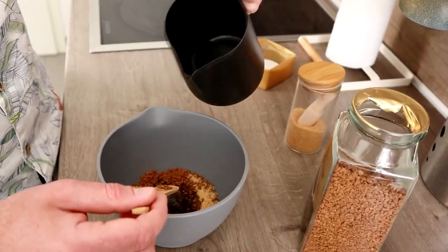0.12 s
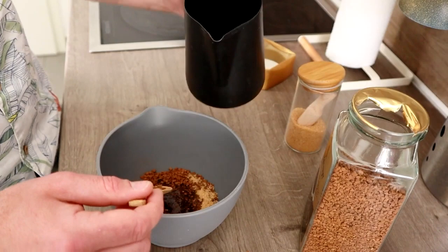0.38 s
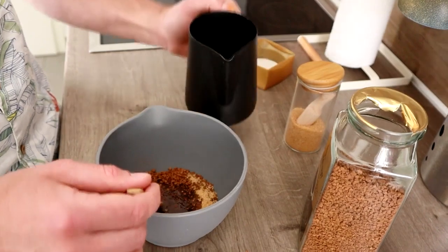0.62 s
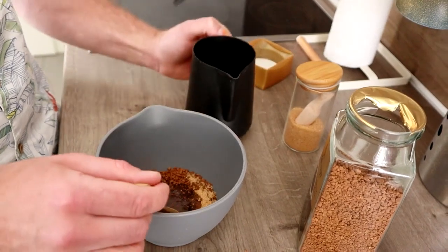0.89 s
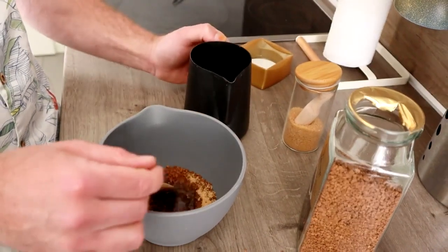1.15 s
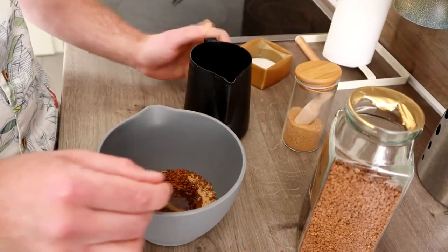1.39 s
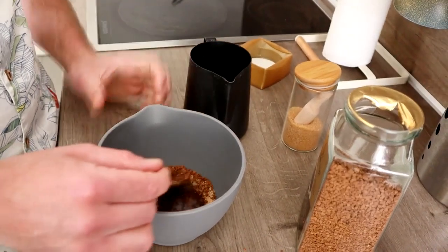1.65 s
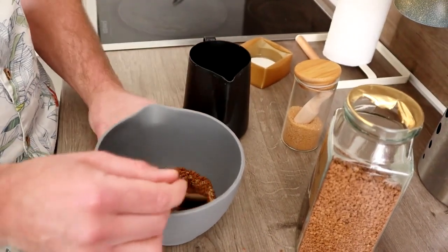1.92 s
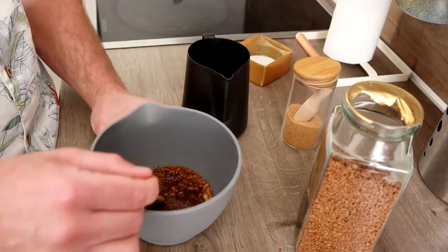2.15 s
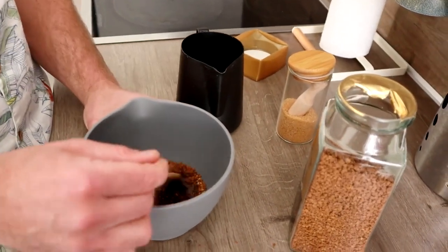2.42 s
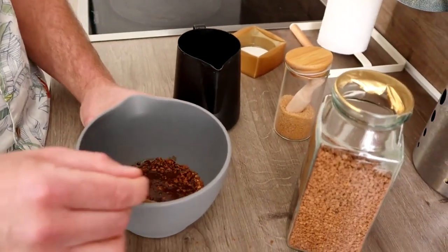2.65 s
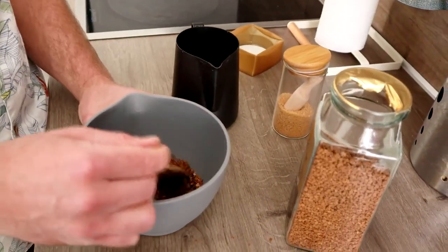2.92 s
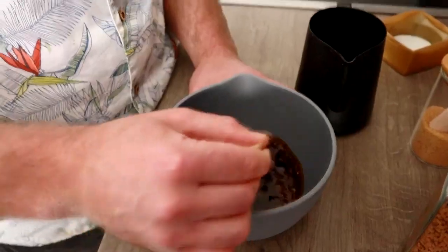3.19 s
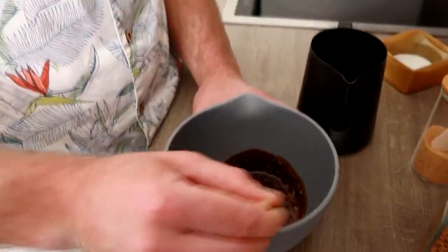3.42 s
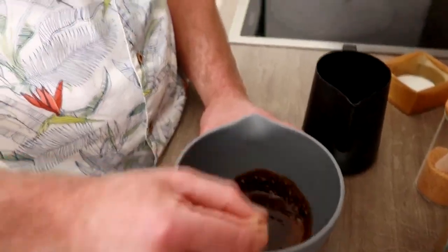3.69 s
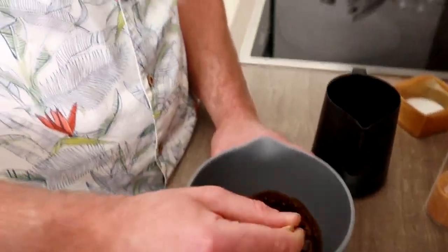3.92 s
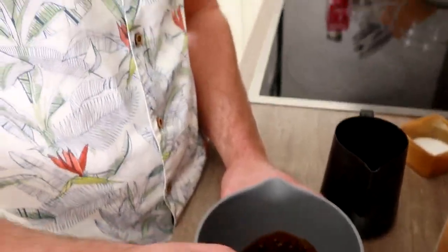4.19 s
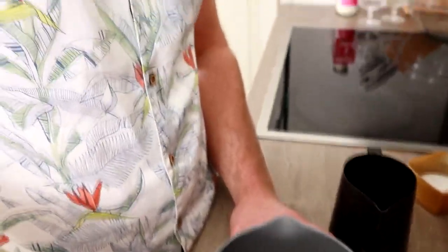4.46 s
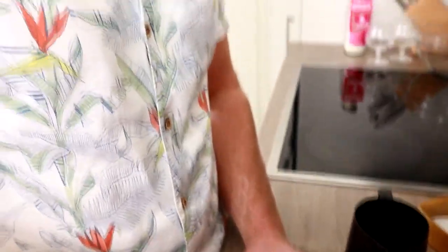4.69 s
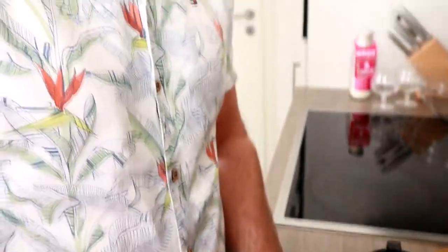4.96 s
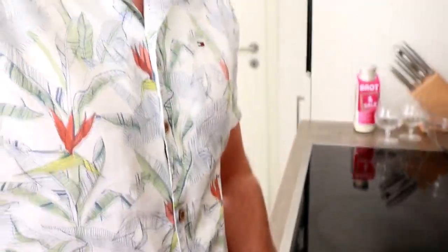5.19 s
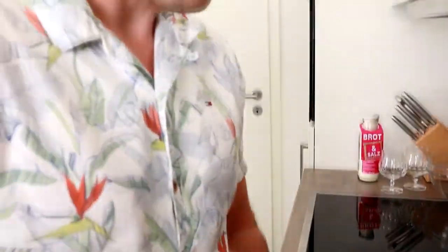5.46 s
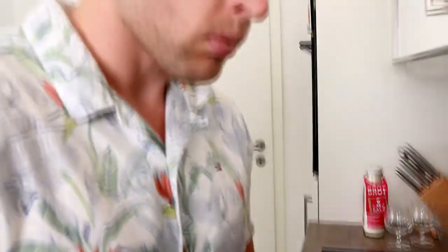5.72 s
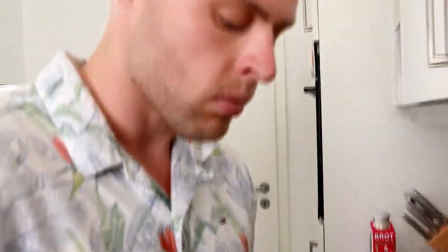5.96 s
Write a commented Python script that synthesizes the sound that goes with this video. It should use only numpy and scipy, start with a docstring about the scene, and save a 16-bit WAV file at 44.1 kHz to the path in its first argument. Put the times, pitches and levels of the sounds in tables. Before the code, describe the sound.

A handheld microphone close to the bowl picks up quiet rumble, light hiss and a little room reflection. After a nearly empty first second, a jug is put down with a knock and small settling taps. Wet granules scrape and crackle under a spoon in a plastic bowl, at first in light irregular strokes, then in fast, forceful circles with hollow scuffs and hard clicks against the side, unbroken to the end.

```python
"""Over counter rumble, microphone handling and hiss, a steel jug first touches the counter faintly.
A spoon then starts stirring wet sugar and coffee granules round a plastic bowl: random grain contacts
and snapping crystals drive the bowl's resonances. Just after one second the jug is set down, its
touches ringing decaying modes. The stirring goes on to the end, harder in the second half, with raps
of the spoon's edge on the wall. Feedback delays give bowl and jug a kitchen around them."""
import sys
import numpy as np
from scipy import signal
from scipy.fft import rfft, irfft, next_fast_len
from scipy.io import wavfile
from scipy.ndimage import uniform_filter1d

SR = 44100
rng = np.random.default_rng(int(sys.argv[2]) if len(sys.argv) > 2 else 0)


def convert_level_to_amplitude(level_db):
    """Map a level in decibels to its linear amplitude factor."""
    exponent = np.asarray(level_db, float) / 20
    return 10 ** exponent


def master(y):
    """Save y as 16-bit WAV."""
    cut = np.clip(np.atleast_2d(y).T, -1, 1)
    pcm = np.round(cut * 32767)  # scale
    wavfile.write(sys.argv[1], SR, pcm.astype(np.int16))


N = 268688

# grip on the microphone: (time [s], level [dB])
HANDLING_CURVE = [(0, -45.5), (.55, -50.5), (.68, -45), (1.0, -54), (1.2, -66), (2.6, -67), (3.09, -62),
                  (3.15, -54), (3.4, -57), (5.7, -57), (5.85, -52), (6.09, -58)]
# colour of the hiss: (frequency [Hz], relative density [dB])
HISS_COLOUR = [(180, -43), (300, -5), (385, -6.5), (654, -21.5), (1290, 2), (8410, -5.5), (15800, -5.5)]
HISS_DB = -56   # before the suppressor

# the jug slides and settles on the counter: (start [s], held [s], level [dB])
JUG_SLIDES = [(.9, 0.093, -41.5), (1.125, .12, -32.5), (1.286, .055, -37)]
SLIDE_RISE_DB_S, SLIDE_SAG_DB_S, SLIDE_FALL_DB_S = 1200, 53, 900
# the bowl is pushed down on the counter: (start [s], held [s], level [dB])
BOWL_THUMPS = [(1.13, 0.089, -48), (1.6, 0.11, -53), (2.2, 0.077, -49), (2.52, 0.021, -58),
               (3.16, 0.025, -59), (4.72, 0.026, -49.5), (5.81, 0.039, -51)]
THUMP_RISE_DB_S, THUMP_SAG_DB_S, THUMP_FALL_DB_S = 170, 41, 153
# rumble under a drag of -33 dB, and its change in dB per dB of drag
COUNTER_DB, COUNTER_LOW_DB, COUNTER_FOLLOWS_DRAG = -52.5, -58.5, 0.21

KITCHEN_T60_S, KITCHEN_DB, WALL_CUT_HZ = 0.46, -19.5, 5300   # t60 of the lows

# jug base meets the counter: (time [s], level [dB], hardness [dB per octave], contact [s])
JUG_TOUCHES = [(0.588, -44.5, -1.5, 0.0016), (1.105, -50, 5, 0.0017), (1.1091, -13.5, 0.5, 0.0027),
               (1.135, -23, -1.5, 0.0022), (1.261, -39, 4, 0.0015), (1.285, -26, 0, 0.002),
               (1.316, -44, 4, 0.019)]
# jug and counter ring: (frequency [Hz], relative level [dB], t60 [s])
JUG_MODES = [(148, -12, 0.13), (218.5, -13, 0.16), (300, -20, 0.06), (378, -12, 0.051), (421, -7.5, 0.11),
             (452, -14.5, 0.21), (483, -31, 0.092), (557, 3, 0.038), (610, -23, .12), (684, -13, 0.04),
             (700, -23, 0.089), (891, -17, 0.2), (1410, -6, 0.023), (1615, -19.5, 0.47), (1540, -17, 0.2),
             (2050, -15, 0.028), (2460, -35, 0.11), (3220, -31, 0.13), (5260, -28, 0.11), (5640, -25, 0.03),
             (6800, -44, 0.36), (6150, -29.5, 0.31), (6800, -29, 0.12), (7250, -41, 0.11), (8349, -41, .2),
             (8700, -34, 0.13), (9900, -33, 0.14), (12000, -24, 0.033)]

# bowl resonances in four registers: (frequency [Hz], width [Hz], relative level [dB])
BODY_MODES = [(616, 43, -2.5), (670, 28.5, 0), (772.5, 73, 2), (878, 17.2, -1), (946, 35, -4),
              (1142, 96, 3), (1234, 67, 2.5), (1297, 124, 6)]
WALL_MODES = [(1772, 173, 6.5), (1818, 82, 5), (1893, 95, 0), (2186, 257, 0.5), (2537, 290, -2),
              (2792, 70, -1.5), (2897, 270, -1), (3209, 120, -2.5), (3413, 214, -0.5), (3980, 490, 1.5)]
UPPER_MODES = [(4470, 116, -1.5), (4690, 100, -4.5), (4940, 210, 1.5), (5440, 380, 2), (5520, 156, 2),
               (5603, 530, -0.5), (6790, 590, 0), (6785, 590, -5)]
GRIT_MODES = [(7640, 680, 3.5), (9000, 700, 2), (9740, 250, 0), (11020, 700, 5.5), (12640, 660, 2),
              (14200, 400, -4.5), (15300, 1100, -5)]

# drags over the bottom that shake the whole bowl:
# (full pressure from [s], held [s], level [dB], favoured body pitch [Hz])
DRAGS = [(0.939, 0.19, -49, 800), (1.117, 0.12, -36.5, 734), (1.3, 0.14, -38.5, 845),
         (1.618, 0.16, -39, 880), (1.772, 0.016, -31, 940), (1.873, 0.097, -36, 950),
         (2.066, 0.066, -37, 860), (2.267, 0.069, -35.5, 930), (2.455, 0.075, -36, 860),
         (2.535, 0.22, -38, 840), (2.749, 0.0058, -32.5, 935), (2.923, 0.008, -51.5, 900),
         (3.025, 0.012, -42.5, 840), (3.153, 0.042, -25, 766), (3.329, 0.096, -31, 804),
         (3.526, 0.024, -26.5, 814), (3.684, 0.074, -33, 685), (3.855, 0.068, -28, 860),
         (4.013, 0.11, -32.5, 820), (4.261, 0.31, -27.5, 808), (4.607, 0.042, -28, 852),
         (4.724, 0.12, -37, 810), (4.987, 0.0041, -27.5, 853), (5.089, 0.218, -34.5, 830),
         (5.395, 0.098, -34, 818), (5.543, 0.117, -38, 830), (5.744, 0.15, -32.5, 826),
         (5.934, 0.17, -38, 860.0)]
DRAG_RISE_DB_S, DRAG_SAG_DB_S, DRAG_FALL_DB_S = 231, 34, 184
FOCUS_PER_DB = 1.26   # a harder drag gathers the body's sound round its favoured pitch
# strokes of the spoon along the wall:
# (full pressure from [s], held [s], level [dB], relative grit [dB], favoured wall pitch [Hz])
STROKES = [(0.764, 0.039, -51.5, -1.5, 3220.0), (0.879, 0.079, -46.5, -3, 3220),
           (0.988, 0.0056, -41.9, -14, 3150), (1.131, 0.013, -37.5, -16, 3070.0),
           (1.222, 0.0057, -35.5, -32, 3250), (1.33, 0.11, -38, -14.5, 2710),
           (1.606, 0.0024, -40.5, -11.3, 3050), (1.697, 0.025, -39.5, -11, 3030),
           (1.764, 0.085, -35, -22, 2670), (1.87, 0.011, -32.5, -17.5, 2740),
           (1.951, 0.087, -41, -15, 2940), (2.113, 0.014, -33, -15.5, 3050),
           (2.233, 0.013, -34.5, -13.8, 3400), (2.292, 0.022, -36, -11, 2940),
           (2.453, 0.026, -40, -19, 3100), (2.525, 0.0058, -29, -16, 3000), (2.612, 0.031, -34, -11, 2640),
           (2.715, 0.038, -37, -14.5, 3270), (2.924, 0.025, -45.5, -18, 3170.0),
           (3.024, 0.04, -42.5, -12.3, 3100), (3.136, 0.005, -27.5, -15, 2700),
           (3.275, 0.0045, -27, -17, 3280), (3.384, 0.028, -27, -14, 2800),
           (3.512, 0.043, -28, -16.5, 3280), (3.673, 0.019, -27.5, -18.5, 3060),
           (3.762, 0.039, -27, -11, 2800), (3.895, 0.015, -27, -17, 2950), (3.988, 0.039, -33, -19, 2880),
           (4.07, 0.011, -26, -16.5, 3210.0), (4.168, 0.11, -31, -11.5, 2930),
           (4.283, 0.056, -32.5, -26, 2960), (4.372, 0.066, -28, -16, 3270), (4.478, 0.015, -28, -11, 2970),
           (4.555, 0.086, -34.5, -14.5, 2850), (4.748, 0.011, -27.5, -16.5, 3410),
           (4.804, 0.13, -38.5, -12, 3360), (4.947, 0.026, -27.5, -12.9, 3150),
           (5.07, 0.034, -28, -25.5, 3040), (5.157, 0.067, -36, -18.4, 3070.0),
           (5.243, 0.011, -31.5, -19, 2820), (5.315, 0.0044, -37, -15, 3150),
           (5.373, 0.034, -33, -28, 2950), (5.48, 0.036, -30, -29, 3440), (5.563, 0.062, -32.5, -21, 2930),
           (5.73, 0.028, -31.5, -21, 3130), (5.87, 0.033, -32.5, -25.5, 3190.0),
           (5.99, 0.041, -32, -17, 2850)]
STROKE_RISE_DB_S, STROKE_SAG_DB_S, STROKE_FALL_DB_S = 294, 0, 178
UPPER_DB, UPPER_FOLLOWS_GRIT = 0.5, 0.31   # a grittier stroke also reaches higher up the wall

# crystals cracking under the spoon: (time [s], level [dB], relative body [dB], relative grit [dB])
CRACKS = [(0.9884, -30, 12.5, -14), (1.0021, -27.5, -10, -6), (1.1109, -25.5, 9.5, -10),
          (1.1323, -29, -11, -25), (1.2206, -25, 0, -21), (1.2414, -30.5, 4.5, -16),
          (1.4296, -26.5, -7, -8), (1.5888, -32, -1, -17), (1.6102, -23.5, -1, -15), (1.6877, -30, -1, -17),
          (1.8068, -34, -11, -29), (1.8716, -34, -16, -22), (2.0128, -29, -14, -8.5), (2.1156, -25, 5, -23),
          (2.1959, -22, -24, -11), (2.2179, -34.5, -8, -16), (2.2303, -17.5, -12, -13),
          (2.4364, -17, -1, -19), (2.4613, -21, -6, -17), (2.4838, -21.5, -12, -19),
          (2.5202, -20.5, 1, -21), (2.5834, -40, -16, -5), (2.614, -24, 0, -18), (2.9043, -29.5, 5, -17),
          (2.9272, -30, -16, -13), (2.9592, -26.5, -13, -16), (3.0041, -31, -5, -13), (3.0254, -37, 9, -19),
          (3.046, -28.5, -11, -19), (3.0839, -24.5, -12, -13), (3.1068, -20, 2.5, -15),
          (3.1318, -13.5, -4, -22), (3.253, -24, -9, -23), (3.272, -22, -17, -25), (3.3742, -28, -8, -17),
          (3.5094, -30, 0, -14), (3.5244, -27, 10.5, -20), (3.6571, -23, 5, -18), (3.696, -18, -2.5, -19),
          (3.7604, -26.5, -8, -16), (3.8901, -34, 0, -19), (3.9943, -25, -10, -13), (4.0592, -25, -18, -17),
          (4.2467, -31, -5, -8), (4.2732, -32, -11, -20), (4.2946, -23, -11, -25), (4.4832, -25, -21, -19),
          (4.7288, -24, -3, -16), (4.7404, -23, -2, -6), (4.7581, -13, -22, -16), (4.8015, -32, -23, -27),
          (4.9062, -31, -16, -15), (4.9576, -25, -20, -20), (4.9757, -19, -5, -16), (5.0499, -24, -18, -20),
          (5.0964, -24, -9, -23), (5.1517, -25, -10, -24), (5.239, -23.5, -6, -33), (5.3098, -22, -12, -15),
          (5.3712, -25.5, 1.5, -21), (5.5628, -22, -6, -30), (5.7049, -29.5, -1, -11),
          (5.7219, -26.5, 2, -22), (5.8651, -23, -8, -29), (5.8975, -27, -17, -19), (5.9949, -20, -13, -22)]
CRUNCH_DB, CRUNCH_T60_S = -5.0, 0.025   # trim of every crack, and how fast it dies
# fine ticks of single crystals against the wall: (time [s], level [dB])
TICKS = [(0.9885, -35), (1.0031, -28), (1.0924, -42), (1.1113, -26), (1.263, -33), (1.3448, -47),
         (2.0118, -33), (2.1945, -27), (2.2178, -38), (2.4393, -34), (2.5182, -30), (2.583, -25.5),
         (2.613, -33), (2.7451, -28.5), (2.927, -39), (3.049, -32), (3.1046, -26.5), (3.3448, -40),
         (3.375, -35), (3.474, -27), (3.5158, -22.5), (3.7015, -25), (3.7489, -21), (3.7848, -27),
         (3.998, -22.5), (4.0592, -26), (4.1968, -41), (4.237, -18), (4.3814, -33), (4.5611, -20),
         (4.7303, -37), (4.7406, -26), (4.9387, -33), (5.0973, -25.5), (5.162, -33), (5.3088, -33)]
TICK_UPPER_DB, TICK_SPREAD_DB = 1.5, 6   # trim and random spread (plus or minus) in the upper modes
# the spoon's edge raps the wall: (time [s], level [dB])
RAPS = [(1.7, -22), (2.228, -16.5), (2.5409, -10.5), (2.9263, -20), (3.1332, -8.5), (3.408, -16),
        (4.065, -16), (4.0754, -11.5), (4.6376, -31), (4.7502, -14), (4.7586, -6), (5.1674, -13.5)]


def rms_one(x):
    """Scale to rms 1."""
    return x / np.sqrt(np.mean(x ** 2) + 1e-20)


def drift(rate_hz):
    """Slow smoothed chance of rms 1, computed at every 20th sample."""
    r = np.exp(-2 * np.pi * rate_hz * 20 / SR)
    noise = rng.standard_normal(N // 20 + 2002)
    slow = signal.lfilter([1], [1, -2 * r, r * r], noise)[2000:]   # skip the filter's start
    return np.interp(np.arange(N) / 20, np.arange(len(slow)), rms_one(slow))


def band(x, low_hz, high_hz):
    """Butterworth band-pass."""
    return signal.sosfilt(signal.butter(2, [low_hz, high_hz], "band", fs=SR, output="sos"), x)


def pushes(rows, rise_db_s, sag_db_s, fall_db_s):
    """Pushes swell, sag while held and die away; total dB, then further columns blended by power."""
    rows, t = np.array(rows), np.arange(0, N + 64, 64) / SR
    s, held, db = rows[:, :3].T[:, :, None]
    rise = rise_db_s * np.maximum(s - t, 0)
    sag = sag_db_s * np.clip(t - s, 0, held)
    fall = fall_db_s * np.maximum(t - s - held, 0)
    power = convert_level_to_amplitude(db - rise - sag - fall) ** 2 + 1e-30
    total = power.sum(axis=0)
    blended = [10 * np.log10(total), *(rows[:, 3:].T @ power / total)]
    return [np.interp(np.arange(N) / SR, t, c) for c in blended]


def hiss(dry):
    """Coloured noise, turned down by a suppressor for a while after loud sound."""
    hz = np.maximum(np.arange(N // 2 + 1) * SR / N, 1)
    colour_hz, colour_db = np.transpose(HISS_COLOUR)
    colour = convert_level_to_amplitude(np.interp(np.log(hz), np.log(colour_hz), colour_db))
    noise = convert_level_to_amplitude(HISS_DB) * rms_one(irfft(rfft(rng.standard_normal(N)) * colour, N))
    level_db = 10 * np.log10(uniform_filter1d(dry[0] ** 2, size=882) + 1e-12)
    fall_db = 11.0 * np.arange(N) / SR   # release of 11 dB per second
    held_db = np.maximum.accumulate(level_db + fall_db) - fall_db
    return noise * convert_level_to_amplitude(-0.3 * np.clip(held_db + 46.5, 0, 25))


def handling():
    """The grip on the microphone makes a slowly wavering noise at the very bottom."""
    s, db = np.transpose(HANDLING_CURVE)
    low = band(band(rng.standard_normal(N), 10, 45), 17, 54.0)
    return convert_level_to_amplitude(np.interp(np.arange(N) / SR, s, db)) * rms_one(low * convert_level_to_amplitude(1.8 * drift(1.8)))


def counter(body_db):
    """Dull lumpy noise: the worktop follows the drags, takes the sliding jug and the bowl's thumps."""
    stirred = convert_level_to_amplitude(COUNTER_FOLLOWS_DRAG * (np.maximum(body_db, -62.) + 33))
    slides_db, = pushes(JUG_SLIDES, SLIDE_RISE_DB_S, SLIDE_SAG_DB_S, SLIDE_FALL_DB_S)
    thumps_db, = pushes(BOWL_THUMPS, THUMP_RISE_DB_S, THUMP_SAG_DB_S, THUMP_FALL_DB_S)
    upper = band(band(rng.standard_normal(N), 150, 900), 150, 900)
    upper = rms_one(upper * convert_level_to_amplitude(1.54 * drift(41) + 2.7 * drift(6.4)))
    lower = rms_one(band(rng.standard_normal(N), 67.6, 141) * convert_level_to_amplitude(3.0 * drift(21)))
    return (upper * (convert_level_to_amplitude(COUNTER_DB) * stirred + convert_level_to_amplitude(slides_db))
            + lower * (convert_level_to_amplitude(COUNTER_LOW_DB) * stirred + convert_level_to_amplitude(thumps_db)))


def kitchen(x):
    """Ten feedback delays, duller on every round, make the room's reverberation."""
    size = next_fast_len(N + SR)
    turn = np.exp(-2j * np.pi * np.arange(size // 2 + 1) / size)   # delay of one sample
    dull = np.exp(-2 * np.pi * WALL_CUT_HZ / SR)
    walls = 0
    for k, lag in enumerate((rng.uniform(0.0071, 0.035, 10) * SR).astype(int)):
        loss = convert_level_to_amplitude(-60 * lag / SR / KITCHEN_T60_S)
        back = loss * (1 - dull) / (1 - dull * turn) * turn ** lag
        walls = walls + (-1) ** k * back / (1 - back)
    return irfft(rfft(x, size) * walls, size)[:N]


def jug():
    """Each touch drives all modes while contact lasts; a harder touch reaches the high ones more."""
    out, t = np.zeros(N), np.arange(5000) / SR
    for hz, db, t60 in JUG_MODES:
        force = np.zeros(N) + 1e-18
        for s, touch_db, hardness_db, contact_s in JUG_TOUCHES:
            rub = rng.standard_normal(len(t)) * np.exp(-t / max(contact_s, 0.0003))
            # the first strike sets the modes off at once, each in its own direction
            rub[0] = 3.3 * rng.choice([-1, 1])
            # what of the contact falls on this mode
            on_mode = abs(np.sum(rub * np.exp(2j * np.pi * hz * t))) ** 2
            rub = rub / np.sqrt(on_mode + np.sum(rub ** 2) / 10)
            i = round(s * SR)
            force[i:i + len(t)] += convert_level_to_amplitude(touch_db + db + hardness_db * np.log2(hz / 500)) * rub
        r, w = convert_level_to_amplitude(-60 / (t60 * SR)), 2 * np.pi * hz / SR
        out += signal.lfilter([0, np.sin(w)], [1, -2 * r * np.cos(w), r * r], force)
    return out


def resonate(x, hz, width_hz):
    """Two-pole resonance that passes unit white noise at rms 1."""
    r = np.exp(-np.pi * width_hz / SR)
    feed = np.sqrt((1 - r * r) / 2) * np.array([1, 0, -1])
    return signal.lfilter(feed, [1, -2 * r * np.cos(2 * np.pi * hz / SR), r * r], x + 1e-18)


def ringing(modes, force, blows, favoured_hz=None, focus_db=0., wander_db=2.5):
    """The moving contact drives modes near its favoured pitch most, each with a wandering strength."""
    gains = []
    for hz, _, db in modes:
        octaves_off = 0 if favoured_hz is None else np.log2(hz / favoured_hz)
        focus = focus_db * np.minimum(np.abs(octaves_off), 0.6)
        gains.append(convert_level_to_amplitude(db - focus + wander_db * drift(8.1)))
    total = np.sqrt(sum(g ** 2 for g in gains))
    out = np.zeros(N)
    for k, (gain, (hz, width_hz, _)) in enumerate(zip(gains, modes)):
        out += (-1) ** k * resonate((force + blows) * gain / total, hz, width_hz)
    return out


def grains(per_s, spread_db, clump_db):
    """Random contacts of unequal size that come in clumps, on a bed of wet friction; rms 1."""
    sizes = convert_level_to_amplitude(spread_db * np.minimum(rng.exponential(1, N), 4)) * rng.choice([-1, 1], N)
    clicks = rms_one(sizes * (rng.random(N) < per_s / SR))
    gritty = clicks + 0.6 * rng.standard_normal(N)
    clumps = np.clip(drift(40) + 0.4 * drift(100), -2.5, 1.5)
    return rms_one(gritty * convert_level_to_amplitude(clump_db * clumps))


def ticks(rel_db, t60):
    """A crystal's tick is a force pulse that rattles for a few milliseconds."""
    rows, out, k = np.array(TICKS), np.zeros(N + 300), np.arange(300)
    rattles = rng.choice([-1, 1], (len(rows), len(k))) * convert_level_to_amplitude(-60 * k / SR / t60)
    for s, size, rattle in zip(rows[:, 0], convert_level_to_amplitude(rows[:, 1] + rel_db), rattles):
        out[round(s * SR) + k] += size * rattle
    return out[:N]


def cracks(rel_db):
    """A crack swells for a moment, snaps at its height, then dies as a short crunch."""
    out, t = np.zeros(N + 4000), np.arange(4000) / SR
    shape = (1 - np.exp(-t / 0.00047)) * convert_level_to_amplitude(-60 * t / CRUNCH_T60_S)
    noise = rng.standard_normal((len(CRACKS), len(t)))
    for (s, crack_db, *_), db, crunch in zip(CRACKS, rel_db, noise):
        force = crunch * shape / shape.max()
        force[shape.argmax()] = 3.0   # the snap
        i = round(s * SR)
        out[i:i + len(t)] += convert_level_to_amplitude(crack_db + db + CRUNCH_DB) * force
    return out[:N]


def bowl(body_db, body_hz):
    """One gritty force shakes body and wall; lone snapping crystals sharpen the treble."""
    scrape_db, grit_db, wall_hz = pushes(STROKES, STROKE_RISE_DB_S, STROKE_SAG_DB_S, STROKE_FALL_DB_S)
    upper_db = UPPER_DB + UPPER_FOLLOWS_GRIT * grit_db + 2.37 * drift(14.2)
    pressed = convert_level_to_amplitude(scrape_db)
    force = grains(per_s=2500., spread_db=0.5, clump_db=2.5)
    snaps = grains(per_s=500., spread_db=4.5, clump_db=5.0)
    wall_force = pressed * rms_one(force + 0.27 * snaps)
    treble_force = pressed * rms_one(force + 0.54 * snaps)

    rows = np.array(CRACKS)
    hard_blows = cracks(np.zeros(len(rows)))
    for s, rap_db in RAPS:
        hard_blows[round(s * SR)] += 3.0 * convert_level_to_amplitude(rap_db)   # one clean force pulse
    tick_db = TICK_UPPER_DB + TICK_SPREAD_DB * rng.uniform(-1, 1, len(TICKS))
    upper_blows = hard_blows * convert_level_to_amplitude(-7.5) + ticks(tick_db, 0.0073)
    grit_blows = cracks(rows[:, 3]) + ticks(0, 0.0025)

    body_focus_db = np.maximum(19.0 + FOCUS_PER_DB * (body_db + 36), 8.)   # per octave
    body = ringing(BODY_MODES, force * convert_level_to_amplitude(body_db), cracks(rows[:, 2]), body_hz, body_focus_db)
    wall = ringing(WALL_MODES, wall_force, hard_blows, wall_hz, focus_db=17.0)
    upper = ringing(UPPER_MODES, treble_force * convert_level_to_amplitude(upper_db), upper_blows)
    grit = ringing(GRIT_MODES, treble_force * convert_level_to_amplitude(grit_db), grit_blows, wander_db=4.5)
    return body + wall + upper + grit


def scene():
    """Bowl and jug with their room, over the counter."""
    body_db, body_hz = pushes(DRAGS, DRAG_RISE_DB_S, DRAG_SAG_DB_S, DRAG_FALL_DB_S)
    near = bowl(body_db, body_hz) + band(jug(), 114, 18000)
    return (near + convert_level_to_amplitude(KITCHEN_DB) * kitchen(near) + counter(body_db))[None]


def band_limit(x):
    """A steep low-pass at the top of the band."""
    return signal.sosfilt(signal.butter(12, 16410, fs=SR, output="sos"), x)


def record(dry):
    """Handling rumble and hiss join the scene, and a steep low-pass cuts the top."""
    low_pass = signal.ellip(12, 0.5, 60, 15720, fs=SR, output="sos")   # cutoff in Hz
    mixed = signal.sosfilt(low_pass, dry + handling() + hiss(dry))
    return band_limit(mixed)


dry = scene()
out = record(dry)
master(out)
```